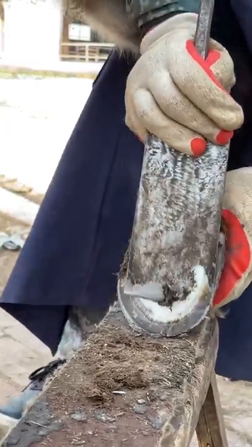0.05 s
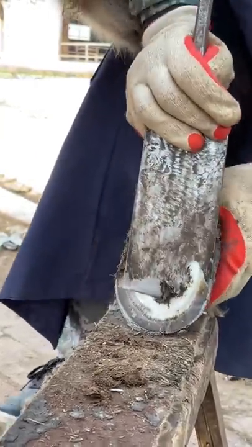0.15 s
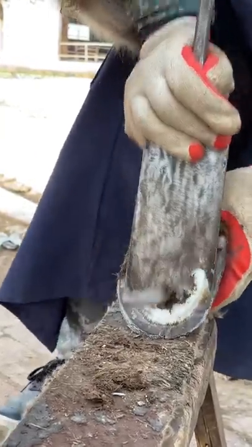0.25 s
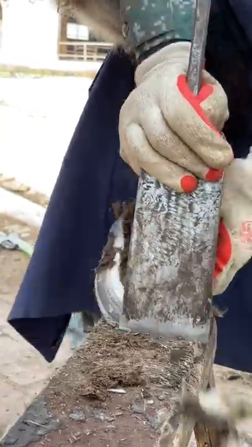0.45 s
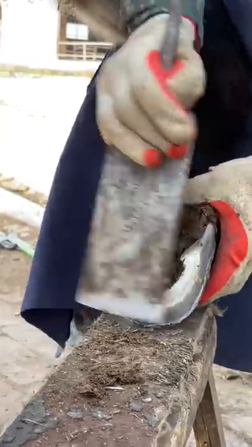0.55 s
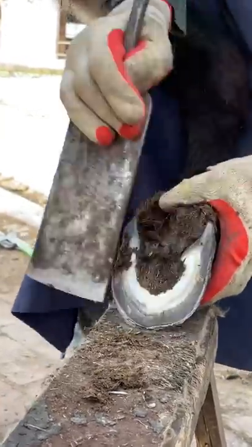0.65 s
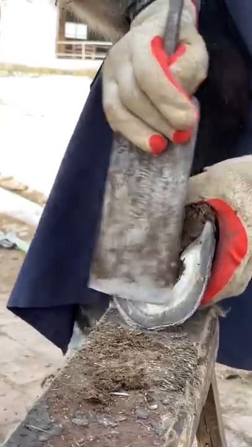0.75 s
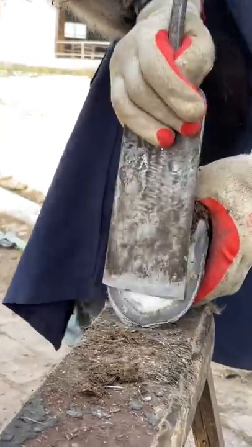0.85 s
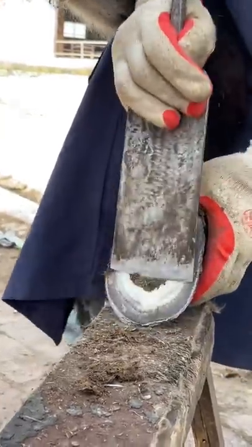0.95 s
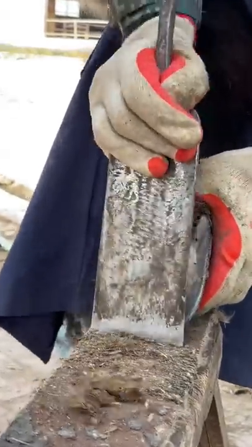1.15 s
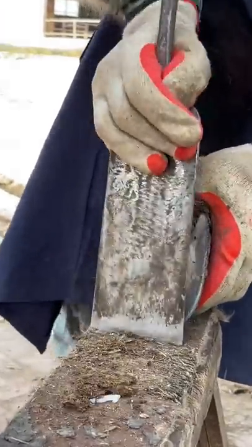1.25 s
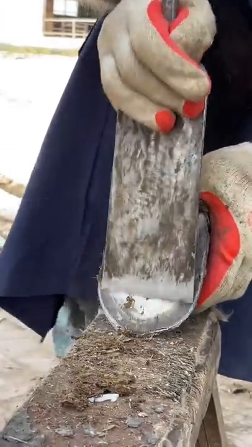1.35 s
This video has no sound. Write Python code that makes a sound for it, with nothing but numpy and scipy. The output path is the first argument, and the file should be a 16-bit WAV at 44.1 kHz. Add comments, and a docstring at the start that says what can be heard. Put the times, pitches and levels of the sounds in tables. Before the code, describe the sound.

A flat steel blade crunches through a hoof, snapping the horn and knocking on a wooden bench. Light scrapes and taps follow, then a second cut and a few clicks, close up over a low outdoor rumble.

```python
"""A hoof being trimmed on a wooden bench, outdoors, close to a two-port microphone, over a low rumble.
After a light scrape, a flat steel blade crunches through the rim of the hoof; the horn snaps free,
the edge knocks on the plank and the bench thumps. The blade taps and scrapes the hoof as it is set
again, and parings drop. About a second in comes the second cut, with its snap, knock and thump,
then a few last clicks, bumps and taps. A faint ring hangs on after each cut."""
import sys
import numpy as np
from scipy import signal
from scipy.fft import rfft, irfft, next_fast_len
from scipy.io import wavfile
from scipy.ndimage import uniform_filter1d

SR = 44100
rng = np.random.default_rng(int(sys.argv[2]) if len(sys.argv) > 2 else 0)


def bounce(signal):
    """Save signal as a 16-bit WAV file at the path given by the first command-line argument."""
    frames = np.transpose(np.atleast_2d(signal))
    limited = np.clip(frames, -1, 1)
    pcm = np.round(limited * 32767).astype(np.int16)
    wavfile.write(sys.argv[1], SR, pcm)


N = 61739
T = np.arange(N) / SR
HZ = np.fft.rfftfreq(4096, 1 / SR)

# The horn snapping free. Each row: start in seconds, level in dB, hold and t60 in seconds,
# tilt in dB per octave.
HORN_SNAPS = [(0.2624, -10, 0.0053, 0.017, 0.9), (1.0391, -18, 0.0079, 0.02, -9)]


def amp(db):
    """Decibels to gain."""
    return 10 ** (np.asarray(db) / 20)


def unit(x):
    """Scales to an rms of 1."""
    return x / np.sqrt(np.mean(x ** 2) + 1e-20)


def curve(points, hz, column=1):
    """One column of a table, interpolated over log frequency."""
    rows = np.array(points, float)
    return np.interp(np.log(hz + 1), np.log(rows[:, 0] + 1), rows[:, column])


def tint(x, colour, tilt_db=0):
    """Colours a sound with a causal filter of unit power gain, tilted in dB per octave."""
    db = curve(colour, HZ) + tilt_db * np.log2(np.maximum(HZ, 100))
    cepstrum = irfft(np.log(amp(db - db.max()) + 1e-5))
    half = len(HZ) - 1
    cepstrum[1:half] *= 2  # minimum phase keeps attacks sharp
    cepstrum[half + 1:] = 0
    impulse = irfft(np.exp(rfft(cepstrum)))[:half]
    return signal.fftconvolve(x, impulse / np.linalg.norm(impulse))[:N]


def envelope(start, rise, t60, hold=0):
    """Straight rise, hold, then a fall of 60 dB in t60; all in seconds."""
    t = T - start
    attack = np.clip(t / max(rise, 1 / SR), 0, 1)
    return attack * np.exp(-np.log(1000) * np.maximum(t - rise - hold, 0) / t60)


def wander(seconds):
    """A smooth random curve that changes over the given time."""
    size = max(1, round(seconds * SR))
    smoothed = uniform_filter1d(rng.standard_normal(N), size, mode="wrap")
    return unit(uniform_filter1d(smoothed, size, mode="wrap"))


def grit(grains_per_s=9000, spread_db=1.5):
    """Dense tiny fractures of uneven size."""
    size = amp(spread_db * np.minimum(rng.exponential(1, N), 4))
    return unit(size * rng.choice([-1, 1], N) * (rng.random(N) < grains_per_s / SR))


def ring(start, modes, rise):
    """A struck body: dying modes (Hz, t60 in seconds, dB) of alternating sign."""
    return sum((-1) ** k * amp(db) * envelope(start, rise, t60) * np.sin(2 * np.pi * hz * (T - start))
               for k, (hz, t60, db) in enumerate(modes))


def rough_tone(hz, depth=0.9, flutter_s=0.004):
    """A tone of the steel, wavering in level and phase as the edge drags."""
    phase = 2 * np.pi * hz * T
    return (1 + depth * wander(flutter_s)) * np.sin(phase) + depth * wander(flutter_s) * np.cos(phase)


def outdoor_air(level_db=-44.5, swell_db=1.6):
    """Low outdoor rumble and faint hiss, gently swelling."""
    # The air's spectrum. Each row: frequency in Hz, relative level in dB.
    colour = [(18, -50), (32, -9.5), (55, -6.5), (140, -8.5), (260, -18.5), (600, -26.5), (1200, -37.5),
              (2400, -38.5), (4800, -45), (7000, -45), (9000, -44.5), (11000, -45.5), (12300, -84),
              (15000, -86)]
    swell = unit(sum(np.sin(2 * np.pi * (hz * T + rng.random())) for hz in np.geomspace(1, 10, 10)))
    return amp(level_db) * unit(tint(rng.standard_normal(N), colour) * amp(swell_db * swell))


def reflections(x, bands, delay_s):
    """A diffuse tail off the surroundings, each band with its own level and decay."""
    hz, t, noise = signal.stft(rng.standard_normal(SR), SR, nperseg=256)
    fall = np.exp(-np.log(1000) * t / curve(bands, hz, column=2)[:, None])
    fall *= amp(curve(bands, hz))[:, None] / np.sqrt(SR * np.mean(fall ** 2, axis=1, keepdims=True))
    tail = signal.istft(noise * fall, SR, nperseg=256)[1]
    return signal.fftconvolve(x, np.r_[np.zeros(round(delay_s * SR)), tail])[:N]


def after_ring(level_db=-56.5):
    """A faint, fuzzy ring that hangs on after each snap."""
    fade = sum(envelope(start, rise=0, t60=3.0) for start, *_ in HORN_SNAPS)
    return amp(level_db) * fade * wander(seconds=0.004) * rough_tone(hz=1653)


def handling_bumps(t60=0.064):
    """Soft, dull bumps as the leg and hands shift on the bench."""
    # Each row: start in seconds, level in dB, pitch in Hz.
    bumps = [(.108, -36, 129), (0.342, -28, 173), (0.423, -36, 184.6), (0.655, -35, 139),
             (.868, -37.5, 225), (.931, -38.5, 311), (1.082, -34, 288), (1.125, -28, 270),
             (1.276, -37.5, 156)]
    return sum(ring(start, [(hz, t60, db)], rise=0.001) for start, db, hz in bumps)


def falling_parings():
    """Parings drop and the hoof shifts: each contact clicks and rings briefly at its own pitch."""
    # Each row: start in seconds, ring level in dB, pitch in Hz, ring t60 in seconds,
    # click level in dB, click tilt in dB per octave.
    contacts = [(0.0488, -28, 287.1, 0.019, -44, -4), (.0605, -56, 585, 0.0135, -40.5, -1.5),
                (0.4526, -28, 1670, 0.0052, -37.5, -1), (0.8125, -26, 2048, 0.043, -30, -2),
                (1.0835, -32, 2230, 0.017, -30.5, 4), (1.1222, -15.5, 512, 0.0093, -33, 5.5),
                (1.212, -42, 2430, 0.021, -41, 6)]
    # The click's spectrum. Each row: frequency in Hz, relative level in dB.
    colour = [(150, 9), (700, 16), (2200, 12.5), (4000, 0), (8000, -7), (11500, -10), (14500, -46)]
    out = np.zeros(N)
    for start, ring_db, hz, t60, click_db, tilt_db in contacts:
        click = tint(grit() * envelope(start, rise=0, t60=0.029), colour, tilt_db)
        out += amp(click_db) * click + ring(start, [(hz, t60, ring_db)], rise=1 / hz)
    return out


def blade_scrapes():
    """The edge rubs over horn and grit as the blade is drawn back and set again."""
    # Each row: start in seconds, level in dB, rise and t60 in seconds, tilt in dB per octave.
    strokes = [(.009, -39, 0.0014, 0.071, 1), (.316, -33.5, 0.0025, 0.047, -5.5),
               (0.364, -35, 0.00079, 0.032, -6), (0.4, -29.5, 0.0028, 0.0368, -5),
               (0.409, -39.5, 0.0019, 0.14, -4), (0.463, -40, 0.013, 0.12, -4.5),
               (0.743, -38, 0.00084, 0.031, 0), (0.769, -46, 0.0011, 0.037, 3),
               (0.823, -41.5, 0.00078, 0.074, 4), (0.856, -53, 0.018, 0.33, 0),
               (0.964, -40.5, 0.017, 0.12, -3), (1.231, -49, 0.0034, 0.8, 0.5)]
    # The scrape's spectrum. Each row: frequency in Hz, relative level in dB.
    colour = [(150, -8.5), (800, -9), (2200, -1.5), (4500, -5.5), (7000, -1), (9000, 2.5), (11200, 0.5),
              (12700, -27), (15000, -34)]
    return sum(amp(db) * tint(grit() * envelope(start, rise, t60), colour, tilt_db)
               for start, db, rise, t60, tilt_db in strokes)


def blade_taps():
    """The blade touches the hoof: a tick, the hollow hoof, and the rough, lingering ring of the steel."""
    # Each row: start in seconds, tick level in dB, tick t60 in seconds, tick tilt in dB per octave,
    # steel and hoof ring levels in dB.
    taps = [(.5615, -41, 0.063, 2, -72, -51), (.7293, -28, 0.045, -1, -54, -31.5),
            (1.2454, -35, 0.054, 1.5, -41, -51), (1.251, -29.5, 0.028, 1, -44, -59)]
    # The tick's spectrum. Each row: frequency in Hz, relative level in dB.
    colour = [(120, -8.5), (600, -4.5), (1950, 3), (3500, -5), (4500, 3.5), (5300, -7.5), (7500, -3.5),
              (11000, -9), (14000, -38)]
    # Modes of blade and hoof. Each row: frequency in Hz, t60 in seconds, relative level in dB.
    steel_modes = [(1690, 0.16, -12.5), (2240, 0.11, -5), (3500, 0.083, -38), (4555, 0.22, -7.5),
                   (4695, 0.069, -4.5), (6674, 0.21, -4), (7600, 0.42, -15), (8750, 0.3, -35)]
    hoof_modes = [(498, 0.0072, -3), (751.5, 0.029, 2.5), (1160, 0.051, -13), (1665, 0.026, -3),
                  (2245, 0.094, -7), (4553, 0.0097, 0.5)]
    out = np.zeros(N)
    for start, tick_db, tick_t60, tilt_db, steel_db, hoof_db in taps:
        steel = sum(amp(db) * envelope(start, 0, t60) * rough_tone(hz) for hz, t60, db in steel_modes)
        tick = tint(grit() * envelope(start, 0, tick_t60), colour, tilt_db)
        hoof = ring(start, hoof_modes, rise=0.00655)
        out += amp(tick_db) * tick + amp(steel_db) * steel + amp(hoof_db) * hoof
    return out


def bench_thumps():
    """The whole bench takes the weight and thumps in its low modes."""
    # Each row: start in seconds, level in dB.
    thumps = [(0.2763, -18.5), (0.7419, -38), (1.0487, -24), (1.128, -32)]
    # The bench's modes. Each row: frequency in Hz, t60 in seconds, relative level in dB.
    modes = [(72.8, 0.16, 0.5), (133.2, 0.1224, -0.5), (183.3, 0.065, -4), (262.8, 0.061, 0)]
    return -sum(amp(db) * ring(start, modes, rise=0.00043) for start, db in thumps)


def plank_knocks(rise_s=0.002):
    """The edge lands on the plank, digs in with a crunch and sets it ringing."""
    # Each row: start in seconds, ring and crunch levels in dB, crunch t60 in seconds, spot 0 or 1.
    knocks = [(0.2674, -13, -13.5, 0.052, 0), (0.2739, -27, -22, 0.041, 0), (1.0421, -9.5, -11, 0.017, 1)]
    # The plank's modes. Each row: frequency in Hz, t60 in seconds, relative dB struck at spots 0 and 1.
    plank_modes = [(450.5, 0.03, -4.5, -7.5), (666, 0.014, -6, -5), (849, 0.01, -24.5, -12.5),
                   (987, 0.016, -15.5, 2.5), (1238, 0.027, 3, -2), (1348, 0.04, -27, -16.5),
                   (1670, 0.02, -6, -14), (1888, 0.022, -36, -7.5), (2043, 0.036, -6, -13),
                   (2344, 0.026, -4, -11.5), (2950, 0.028, -35, -12), (3480, 0.033, -13.5, -21)]
    # The crunch of the wood. Each row: frequency in Hz, relative level in dB.
    colour = [(60, -25), (300, -5.5), (600, -3.5), (1200, -1.5), (2200, -6), (3200, -14.5), (5000, -31.5),
              (9000, -20), (14000, -47)]
    out = np.zeros(N)
    for start, ring_db, crunch_db, crunch_t60, spot in knocks:
        modes = [(hz, t60, levels[round(spot)]) for hz, t60, *levels in plank_modes]
        crunch = tint(grit() * envelope(start, rise_s, crunch_t60), colour)
        out += amp(ring_db) * ring(start, modes, rise_s) + amp(crunch_db) * crunch
    return out


def horn_cuts(clump_db=3, clump_s=0.00208):
    """The crunch grows in clumps as the blade sinks in, and the horn snaps as it breaks through."""
    # Pushes of the blade. Each row: start and length in seconds, final level in dB, growth in dB.
    pushes = [(0.1987, 0.016, -36, 19), (.2137, .004, -21.5, 6), (.218, .0455, -23.5, 12.5),
              (0.987, 0.047, -40.5, 24), (1.0345, 0.009, -21, 12)]
    # Spectra of horn crunching and snapping. Each row: frequency in Hz, relative level in dB.
    crunch_colour = [(100, -17), (600, -11), (1150, 6.5), (2200, 4.5), (4600, 2), (7000, 4), (8200, 7),
                     (9500, 2.5), (11000, 4.5), (12500, -12), (15000, -27)]
    snap_colour = [(100, -58.5), (450, -18.5), (1000, -13), (2300, -10), (2900, -15.5), (3500, -5),
                   (4700, -20), (5800, -3), (7000, -7.5), (7850, 2), (9000, -6.5), (11500, -16),
                   (14500, -30.5)]
    force = np.zeros(N)
    for start, length, end_db, growth_db in pushes:
        remaining = np.maximum(1 - (T - start) / length, 0)
        force += amp(end_db - growth_db * remaining) * (T >= start) * (T < start + length)
    snaps = sum(tint(grit() * amp(db) * envelope(start, 0, t60, hold), snap_colour, tilt_db)
                for start, db, hold, t60, tilt_db in HORN_SNAPS)
    fractures = unit(grit() * amp(clump_db * wander(clump_s)))
    return tint(force * fractures, crunch_colour) + snaps


def scene():
    """The work sits close and central; reflections and air differ between left and right."""
    # Reflections off bench and ground, and off the yard.
    # Each row: frequency in Hz, level in dB, t60 in seconds.
    near = [(101, -23, 0.13), (490, -9, 0.051), (1520, -17.5, 0.068), (4880, -15.5, 0.1112),
            (13000, -21, 0.068)]
    yard = [(101, -43, 0.58), (383, -20.5, 0.63), (1130, -35, 1), (2200, -30.5, 1), (6030, -36.5, 1),
            (13000, -39, 0.66)]
    direct = horn_cuts() + plank_knocks() + bench_thumps()
    direct += blade_taps() + handling_bumps() + falling_parings() + blade_scrapes()
    middle = direct + reflections(direct, near, delay_s=0.005) + reflections(direct, yard, delay_s=0.033)
    middle += outdoor_air() + after_ring()
    side = amp(-3.5) * reflections(direct, yard, delay_s=0.075)
    side += amp(-2) * reflections(direct, near, delay_s=0.0022)
    side += amp(-21) * outdoor_air()
    return np.array([middle + side, middle - side])


def record(dry):
    """The microphone's two ports, unequal in phase and level; then the deepest lows are taken away, peaks
    rounded, and the band limited."""
    # Phase between the ports. Each row: frequency in Hz, lead of the left in radians.
    port_phase = [(30, 0), (300, 0), (850, .55), (1300, -.2), (2500, .55), (4000, .65), (4600, 1.7),
                  (5000, 3.7), (5550, 6.05), (6100, 6.4), (7000, 7.5), (8000, 8.9), (9100, 9.42),
                  (10000, 10.3), (11900, 12.57)]
    # Balance of the ports. Each row: frequency in Hz, left minus right in dB.
    port_balance = [(60, -0.5), (160, -2), (330, -6), (650, -5.5), (950, -5), (1500, 0.7), (12000, -0.5)]
    low_cut_hz, high_cut_hz, ceiling = 32, 15000, 0.85
    size = next_fast_len(N + len(HZ))
    hz = np.fft.rfftfreq(size, 1 / SR)
    phase, balance = curve(port_phase, hz), amp(curve(port_balance, hz))
    ports = np.array([balance * np.exp(.5j * phase), np.exp(-.5j * phase)])
    ports /= np.sqrt((1 + balance ** 2) / 2)  # keeps the total power
    pair = irfft(rfft(dry, size) * ports, size)[:, :N]
    pair = signal.sosfilt(signal.butter(2, low_cut_hz, "highpass", fs=SR, output="sos"), pair)
    pair = pair / (1 + (pair / ceiling) ** 6) ** (1 / 6)
    band_limit = signal.firwin(255, high_cut_hz, window=("kaiser", 9), fs=SR)
    return signal.oaconvolve(pair, band_limit[None], "same")


dry = scene()
out = record(dry)
bounce(out)
```